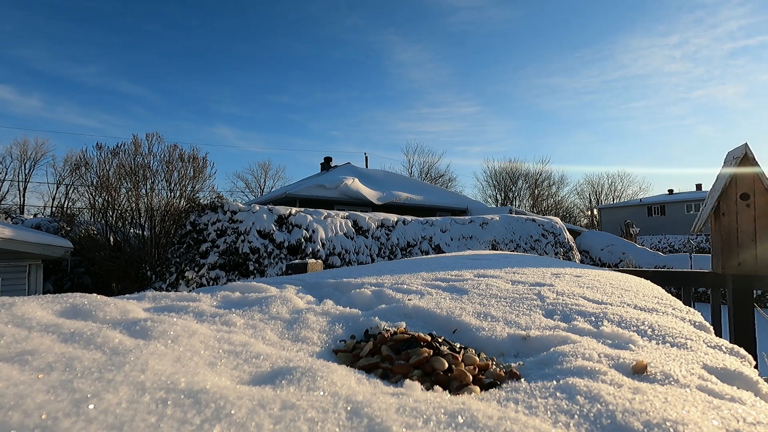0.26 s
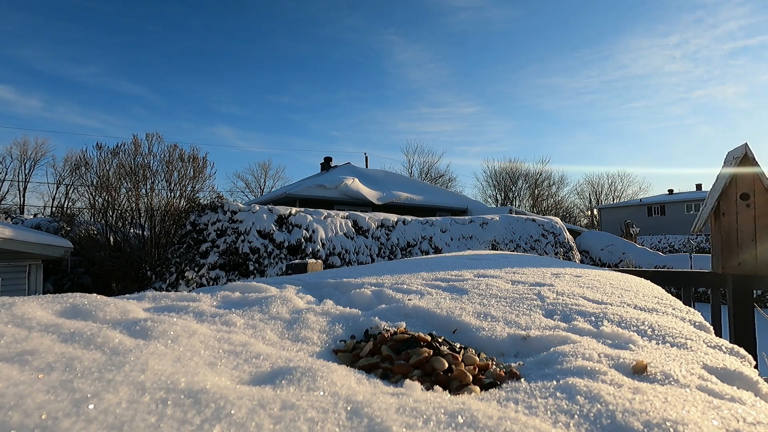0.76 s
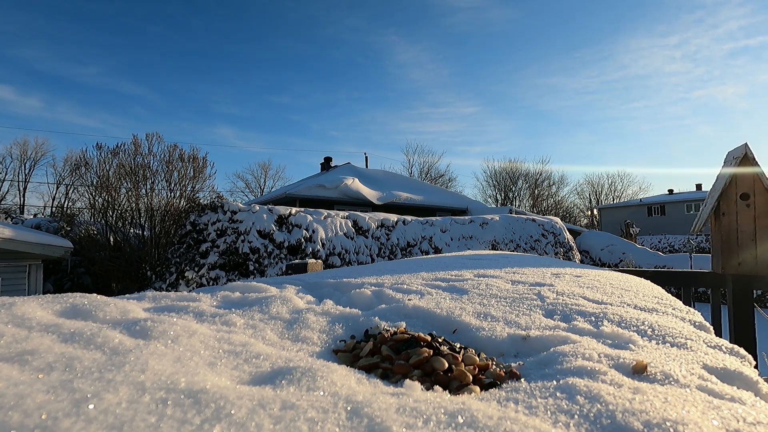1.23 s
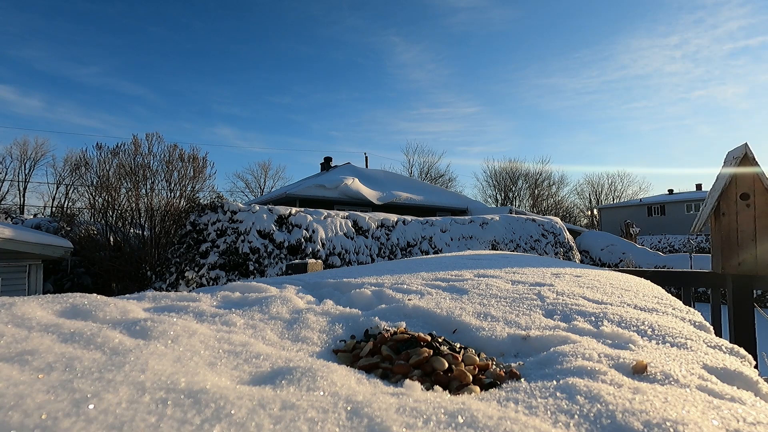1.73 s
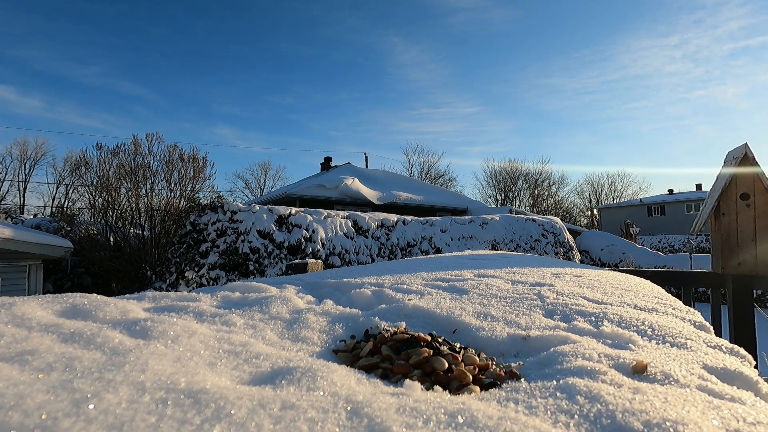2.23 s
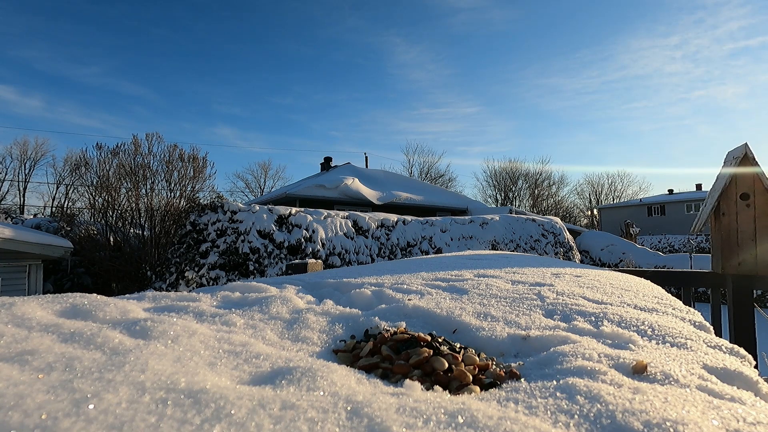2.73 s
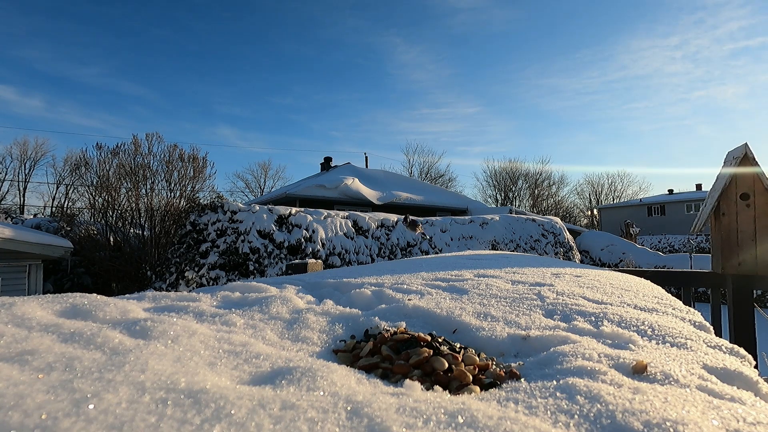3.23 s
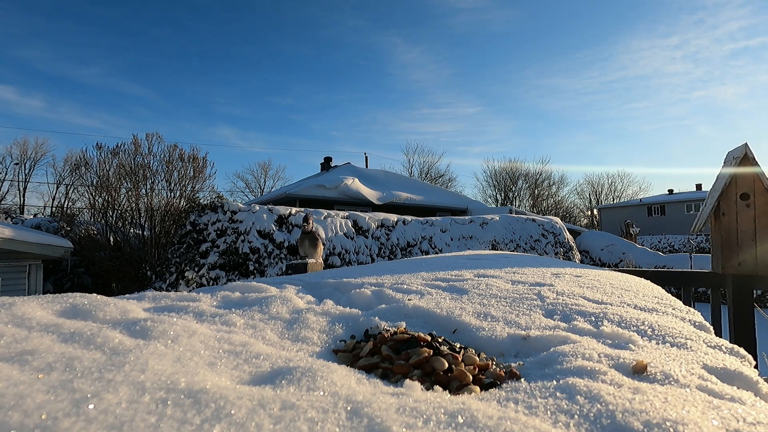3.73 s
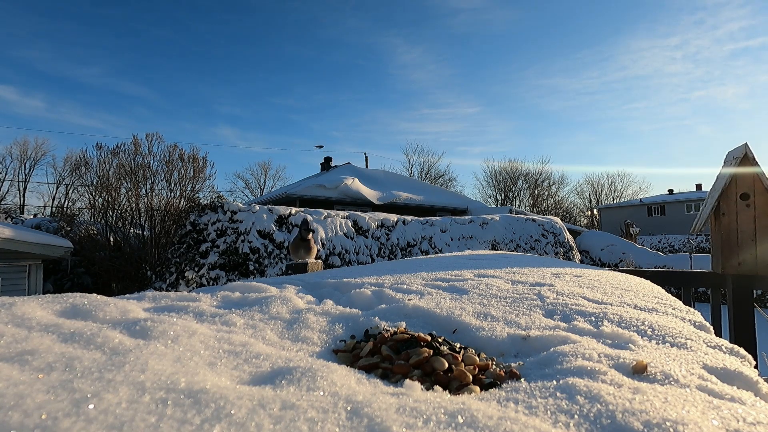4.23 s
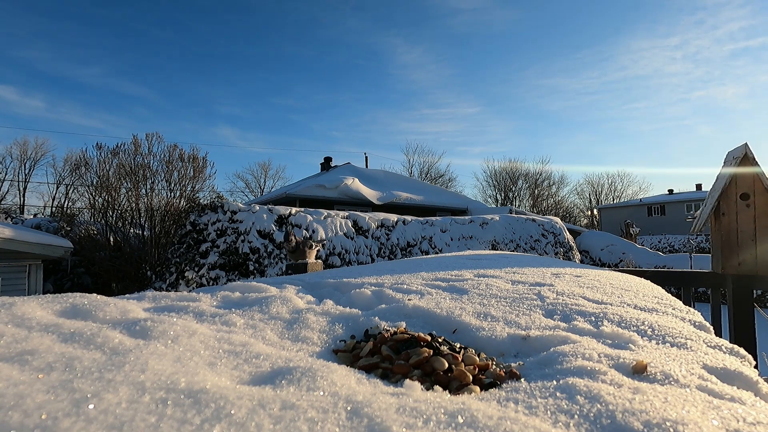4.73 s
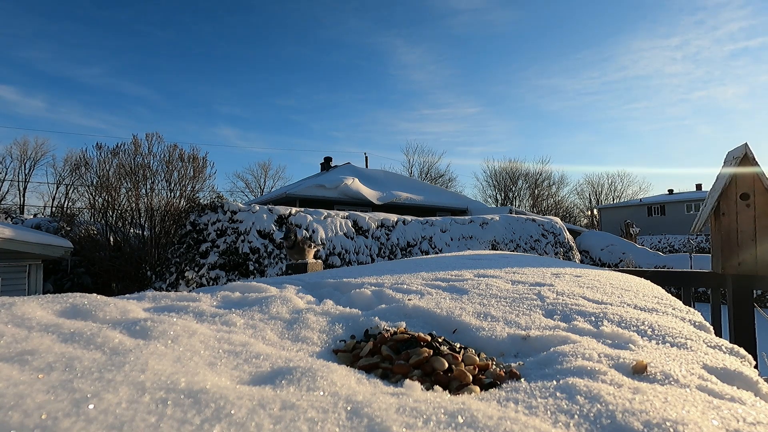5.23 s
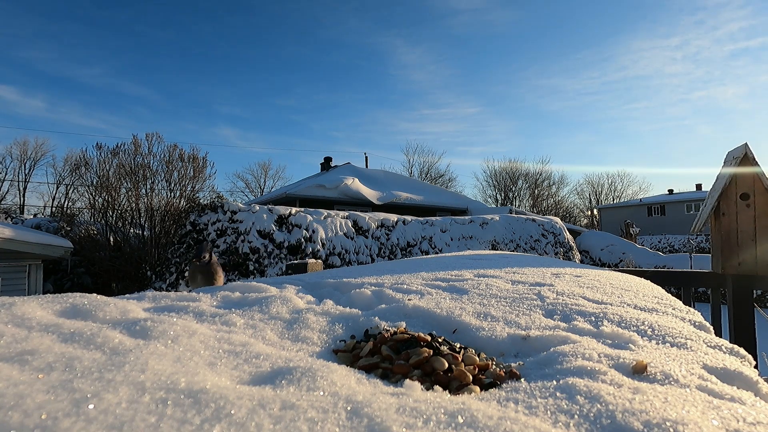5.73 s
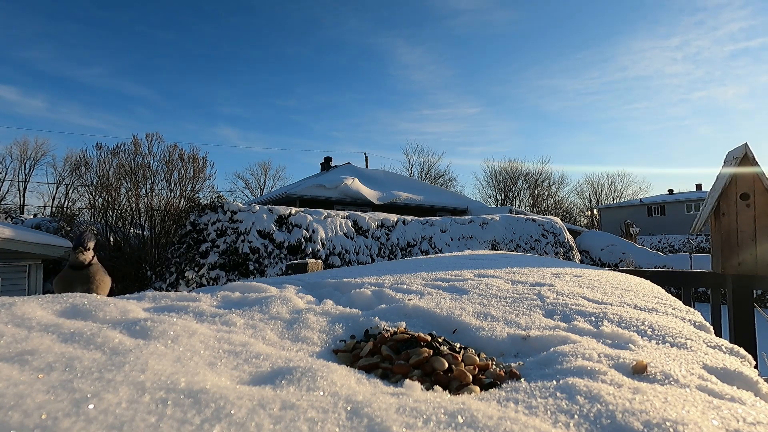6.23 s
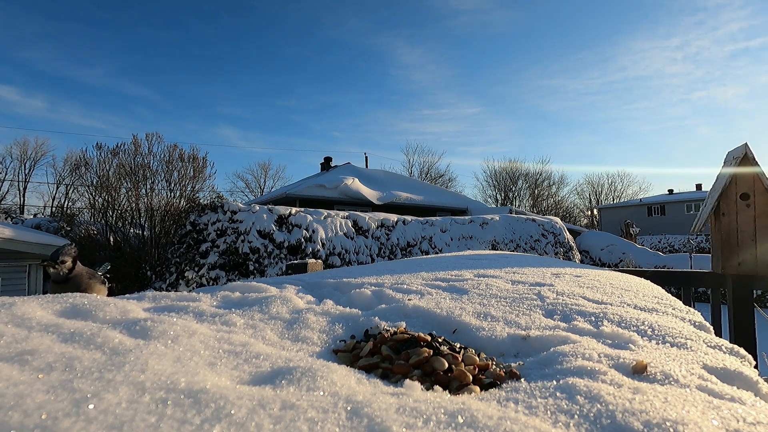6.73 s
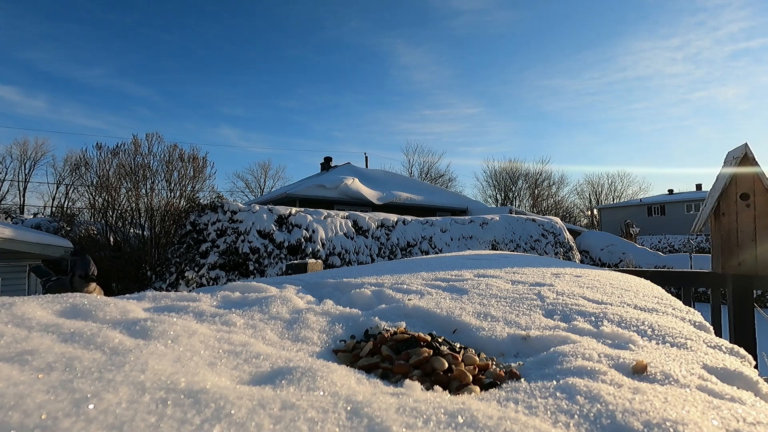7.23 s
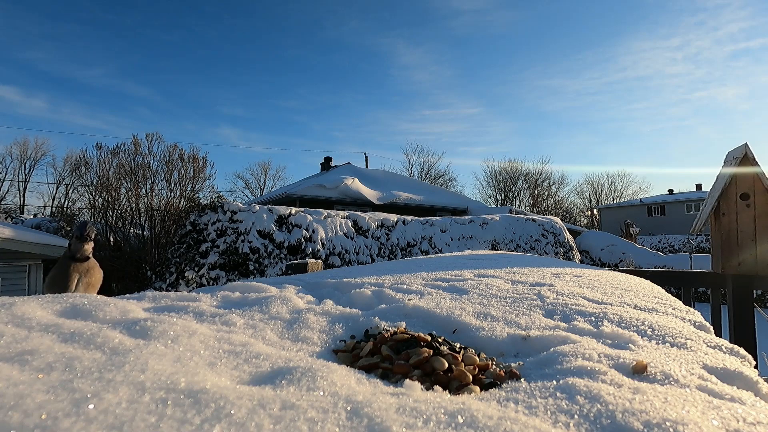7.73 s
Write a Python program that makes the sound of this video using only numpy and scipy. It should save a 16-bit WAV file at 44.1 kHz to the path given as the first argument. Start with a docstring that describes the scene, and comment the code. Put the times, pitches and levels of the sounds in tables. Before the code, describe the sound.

Quiet snowy yard with far town rumble, soft bumps and a claw tick, faint small bird notes, and two raspy jay calls.

```python
"""A snowy backyard over the low rumble of a town, picked up by a two-port microphone.
A blue jay jeers twice, first from cover, then in the open: the two sides of its syrinx start locked
at 2:3, slip apart and beat, which makes the call harsh. Chips, whistles and far notes are gliding tones.
Low puffs of air, a landing, bumps and scratches are short bursts of coloured noise; traffic, buffeting
air, hiss and a recurring sizzle are noise too. Branches and walls scatter and echo the bird voices."""
import sys
import numpy as np
from scipy import signal
from scipy.fft import rfft, irfft, next_fast_len
from scipy.io import wavfile
from scipy.ndimage import uniform_filter1d

SR = 44100
rng = np.random.default_rng(int(sys.argv[2]) if len(sys.argv) > 2 else 0)


def generate_wav(sig):
    """Save sig (samples, or channels by samples) to the path in sys.argv[1] as 16-bit PCM at SR."""
    pcm = np.round(np.clip(np.atleast_2d(sig).T, -1, 1) * 32767).astype(np.int16)
    wavfile.write(sys.argv[1], SR, pcm)


N = 352076
TIME = np.arange(N) / SR

# the town's changing strength, before each layer's own gain: start_s, rumble_db, buffeting_db
TOWN_LEVELS = [(0.0, -58, -68), (0.35, -61.5, -74), (0.69, -60, -70), (2.22, -59, -75.5), (3.0, -57.5, -76),
               (3.91, -54.5, -70), (4.4, -54, -73), (4.8, -48, -55.5), (5.0, -51.5, -67.5),
               (5.24, -50.5, -69), (6.0, -47, -54), (6.22, -48, -55), (6.84, -53.5, -63.5),
               (7.31, -48, -51.5), (7.56, -51.5, -63.5), (7.98, -46.5, -55)]
JEER_S, SCOOP_S = .265, .012  # length of a jeer; time it takes to scoop into pitch and level
LAST_SLIP_HZ = 265  # slip between the jay's voices at the end of a jeer


def from_db(db):
    """Decibels to gain."""
    return 10 ** (np.asarray(db) / 20)


def rms_one(x):
    """Scale to unit power."""
    return x / np.sqrt(np.mean(x ** 2) + 1e-20)


def columns(rows, t):
    """Each column of a curve table at the times t."""
    s, *values = np.transpose(rows)
    return [np.interp(t, s, v) for v in values]


def at_hz(points, hz):
    """Read a spectrum on a log-frequency axis."""
    f, value = np.transpose(points)
    return np.interp(np.log(np.maximum(hz, 1)), np.log(f), value)


def band(x, hz, kind="low", order=2):
    """Butterworth filter."""
    return signal.sosfilt(signal.butter(order, np.clip(hz, 10, .45 * SR), kind, fs=SR, output="sos"), x)


def drift(rate_hz, size):
    """Smooth chance of spread 1: white noise kept below rate_hz."""
    slow = band(rng.standard_normal(size + SR // 2), rate_hz)
    return rms_one(slow)[-size:]


def noise(colour):
    """Stereo noise of rms 1 and given colour (hz, relative db per Hz), falling away above its last point."""
    # how alike left and right are: pitch_hz, likeness (share)
    likeness = [(30, .93), (80, 0.94), (400, 0.9), (1200, 0.48), (4000, 0.27), (8000, 0.73), (12000, 0.26)]
    hz = np.arange(N // 2 + 1) * SR / N
    rolloff = np.hypot(1, (hz / colour[-1][0]) ** 2 / 2)
    mid, side = rfft(rng.standard_normal((2, N))) * from_db(at_hz(colour, hz)) / rolloff
    alike = np.clip(at_hz(likeness, hz), 0, 1)
    return rms_one(irfft(np.sqrt(1 + alike) * mid + np.sqrt(1 - alike) * side * [[1], [-1]], N))


def bursts(rows, rise):
    """Envelope of events (start_s, level_db, fade_s) that swell within about rise seconds and die away."""
    out = np.zeros(N)
    for s, level_db, fade in rows:
        first = int(s * SR)
        age = TIME[:N - first][:2 * SR]
        out[first:][:len(age)] += from_db(level_db) * (1 - np.exp(-age / rise)) * np.exp(-age / fade)
    return out


def span(start, length, edge):
    """The samples that a note covers, their age, and a gate with soft edges."""
    at = np.arange(int(start * SR), int((start + length) * SR))
    gate = np.clip(np.minimum(at - at[0], at[-1] - at) / (edge * SR), 0, 1)
    return at, TIME[:len(at)], gate


def turn(hz):
    """Phase of a running pitch."""
    return 2 * np.pi * np.cumsum(hz) / SR


def ramp(x):
    """Rise from 0 to 1 and stay there."""
    return np.clip(x, 0, 1)


def syrinx(call, pitch, age):
    """A jeer scoops up under high press, relaxes, lets its voices part and drops away."""
    scoop_hz, scoop_db = 416.3, 8.5
    drop_hz, drop_db, drop_s = 186, 16.5, 0.0195
    parting_s, slip_power = 0.0069, 1.6  # the voices part suddenly, then slip ever faster
    upper_db, upper_pressed_db = -3, -6  # strength of the upper voice, and its change under full press
    start, level_db, accent_db, pressed_s, part_s, first_slip_hz, swell_db = call
    scoop = np.exp(-(age / SCOOP_S) ** 2)
    drop = ramp(1 - (JEER_S - age) / drop_s)
    press = 1 / (1 + (age / pressed_s) ** 6)
    parted = ramp((age - part_s) / (JEER_S - part_s))
    low_hz = columns(pitch, start + age)[0] - scoop_hz * scoop - drop_hz * drop
    slip_hz = first_slip_hz + (LAST_SLIP_HZ - first_slip_hz) * parted ** slip_power
    slip_hz *= ramp((age - part_s) / parting_s)
    loud_db = level_db + accent_db * press - scoop_db * scoop - drop_db * drop ** 2
    upper_voice_db = upper_db + upper_pressed_db * press + swell_db * parted ** 2
    return low_hz, slip_hz, loud_db, press, upper_voice_db


def flow_unrest(slip, slip_hz, age):
    """Unruliness of the air flow: always some, more in the scoop, at each jerk and when the slip is fast."""
    calm, at_jerk, at_fastest, in_scoop = .18, .65, 1.25, 2.6
    jerk = np.sin(slip / 2) ** 4
    fast = (slip_hz / LAST_SLIP_HZ) ** 2
    return calm + at_jerk * jerk + at_fastest * fast + in_scoop * np.exp(-age / SCOOP_S)


def jeer(call, pitch, colour, rasp_db, air_db):
    """Two voices share one air stream, so sums and differences of their pitches sound too."""
    # tones the two voices make together: multiple_of_lower, multiple_of_upper
    mixes = [(-1, 1), (1, 0), (-2, 2), (-5, 4), (3, -1), (0, 1), (-3, 3), (2, 0), (-1, 2), (4, -1), (1, 1),
             (-2, 3), (3, 0), (0, 2), (2, 1), (-1, 3), (4, 0), (1, 2), (3, 1), (6, -1), (5, 0), (4, 1),
             (6, 0), (5, 1), (7, 0), (8, 0)]
    # their relative strengths, in the same order: level_db
    mix_db = [-12, -7, -29.5, -16, -14, 4, -26.5, -7.5, -13.5, -31, -17, -20, -9, -23, -11.5, -20, -17,
              -12.5, -15, -24, -25, -26.5, -41, -46, -53, -55.5]
    # what full press, at the start of a jeer, does to the voice: pitch_hz, gain_db
    press_colour = [(900, -10.5), (1750, -14), (2750, -0.5), (3650, 11.5), (4300, 11), (5500, 7), (6400, 4),
                    (7300, 0), (8300, 0), (11000, 8.5)]
    # air noise in the jay's throat: pitch_hz, relative level_db per Hz
    turbulence = [(1300, -29.5), (2000, -1.5), (2800, -6), (4200, 0), (5500, 2), (7000, 3), (7900, 1.5),
                  (9000, -16), (10500, -20), (12500, -32.5), (15500, -34)]
    pitch_wobble = 0.0083  # share of the pitch, at unruliness 1
    beat_pull = 0.15  # radians by which each beat tugs both voices
    at, age, gate = span(call[0], JEER_S, edge=0.0015)
    low_hz, slip_hz, level_db, press, upper_db = syrinx(call, pitch, age)
    high_hz = (3 * low_hz + slip_hz) / 2
    # the voices cling to their lock and pass each other in a jerk
    slip = turn(slip_hz)
    slip -= 0.48 * np.sin(slip)
    unrest = flow_unrest(slip, slip_hz, age)
    wobble = pitch_wobble * unrest * drift(700, len(at))
    common = turn(low_hz * (1 + wobble)) + beat_pull * np.sin(slip)
    low = common + .1 * np.sin(slip)
    high = (3 * common + slip) / 2
    voice = np.zeros(len(at))
    for (m, n), tone_db in zip(mixes, mix_db):
        hz = m * low_hz + n * high_hz
        colour_db = press * at_hz(press_colour, hz) + at_hz(colour, hz) + upper_db * (n != 0)
        flutter_db = 1.95 * drift(94, len(at))
        throat_lag = (hz / 2000) ** 2  # the throat smears each pulse
        voice += from_db(tone_db + colour_db + flutter_db) * np.cos(m * low + n * high - throat_lag)
    voice /= np.sqrt(uniform_filter1d(voice ** 2, size=200))  # even out the loudness
    voice *= 1 + from_db(rasp_db) * unrest * drift(600, len(at))
    voice += from_db(air_db) * unrest * noise(turbulence)[0, at]
    voice = band(voice, (1170, 1420), "bandstop")  # Hz; the throat passes little here
    out = np.zeros(N)
    out[at] = band(voice * gate * from_db(level_db), 820, "high", order=4)
    return out


def jay():
    """Two jeers: one through the hedge with much scatter, one in the open with little."""
    # jeers: start_s, level_db, opening_accent_db, pressed_s, voices_part_after_s, first_slip_hz,
    # upper_voice_swell_db
    calls = [(1.894, -38.5, 3, 0.032, .05, 104, 9), (4.8135, -25, 7, 0.03, .082, 60, 1)]
    # lower voice through the body of each jeer, one list per jeer: time_s, pitch_hz
    pitches = [
        [(1.915, 1833), (1.939, 1872), (1.961, 1774), (2.031, 1744), (2.14, 1610)],
        [(4.835, 1840), (4.863, 1850), (4.873, 1805), (4.921, 1808), (4.985, 1707), (5.062, 1697)],
    ]
    # throat and beak as heard through the hedge: pitch_hz, gain_db
    colour_hidden = [(900, -1), (1700, 8.5), (2650, 3.5), (3500, 5), (4400, 2.5), (5300, -3.5),
                     (6200, -4.5), (7200, 5), (8200, -24), (11000, 7)]
    # throat and beak as heard in the open: pitch_hz, gain_db
    colour_open = [(900, -4), (1700, 2.7), (2650, -2), (3500, -2), (4400, 2), (5300, -7), (6300, 2.5),
                   (7200, 6), (8300, -8), (11000, 2.5)]
    hidden = jeer(calls[0], pitches[0], colour_hidden, rasp_db=-22, air_db=-18)
    near = jeer(calls[1], pitches[1], colour_open, rasp_db=-20, air_db=-13)
    hidden = yard(hidden, scatter_db=-5.5, echo_db=-2, pan_db=-.5)
    return hidden + yard(near, scatter_db=-23.0, echo_db=-1, pan_db=1.1)


def tone(at, hz, height, waver):
    """A nearly pure note on the given samples; waver is a share of its pitch."""
    out = np.zeros(N)
    out[at] = np.sqrt(2) * height * np.sin(turn(hz * (1 + waver * drift(200, len(at)))))
    return out


def arch(share):
    """Level in dB of a note that swells to its middle and is 8 dB softer at its ends."""
    return -8 * (2 * share - 1) ** 2


def chip(start, length, level_db):
    """A quick high downward slide."""
    from_hz, to_hz, glide = 8000, 6400, .23  # glide as a share of the length
    at, age, gate = span(start, length, edge=0.00156)
    hz = to_hz + (from_hz - to_hz) * np.exp(-age / (glide * length))
    return tone(at, hz, gate * from_db(level_db + arch(age / length)), waver=0.012)


def whistle(start, length, held_s, first_hz, held_hz, level_db):
    """Glide to a pitch, climb a little while holding it, then fall to a softer tail."""
    glide_s, climb_hz_per_s = .017, 720
    onset_db, swell_s = 22, 0.021
    fall_hz, fall_s, fall_db = 735, .023, 12
    at, age, gate = span(start, length, edge=0.003)
    fall = 1 - np.exp(-np.maximum(age - held_s, 0) / fall_s)
    hz = held_hz + (first_hz - held_hz) * np.exp(-age / glide_s) - fall_hz * fall
    hz += climb_hz_per_s * (np.minimum(age, held_s) - held_s / 2)
    loud_db = level_db - onset_db * np.exp(-age / swell_s) - fall_db * ramp(2 * fall)
    return tone(at, hz, gate * from_db(loud_db), waver=0.0099)


def chips_and_whistles():
    """High chips of a small bird and soft whistles of the jay, scattered by the branches."""
    # high chips of a small bird: start_s, length_s, level_db
    chips = [(1.734, .062, -68), (3.273, 0.0334, -51.5)]
    # soft whistles of the jay: start_s, length_s, held_s, first_hz, held_hz, level_db
    whistles = [(5.559, 0.14, 0.11, 2970, 2670, -61.5), (5.784, 0.2, .115, 2360, 2616, -56),
                (6.039, .205, .118, 2190, 2570, -56.5)]
    small = sum(chip(*row) for row in chips) + sum(whistle(*row) for row in whistles)
    return yard(small, scatter_db=-5.0, echo_db=-8.0, pan_db=-3.0)


def far_note(start, length, first_hz, last_hz, level_db):
    """A note that wanders as it sinks."""
    at, age, gate = span(start, length, edge=.01)
    wander = .011 * drift(14, len(at))  # slow unsteadiness, share of the pitch
    hz = (first_hz + (last_hz - first_hz) * age / length) * (1 + wander)
    return tone(at, hz, gate * from_db(level_db + arch(age / length)), waver=.021)


def far_birds():
    """Sinking notes at a distance: their level flutters and scatter outweighs the direct sound."""
    # start_s, length_s, first_hz, last_hz, level_db (before the distance loss)
    far_notes = [(.42, 0.6, 3450, 3110, -79.5), (1.499, 0.6, 3560, 3270, -86), (2.45, 0.6, 3230, 3053, -82),
                 (5.499, 0.63, 3400, 3150, -83), (6.756, 0.15, 1017, 885, -64)]
    distance_db = -11
    far = sum(far_note(*row) for row in far_notes) * from_db(3 * drift(25, N) + distance_db)
    return yard(far, scatter_db=1.5, echo_db=5.0, pan_db=6.0)


def air_puffs():
    """Soft low puffs of air: low-passed noise that starts fast and fades."""
    # start_s, level_db, fade_s, upper_edge_hz
    puffs = [(.195, -48, 0.057, 267), (.916, -44.5, 0.048, 210), (1.693, -45.5, 0.09, 493),
             (3.298, -35.5, 0.02, 229), (3.644, -51, 0.04, 230), (3.787, -44.5, 0.049, 556),
             (5.809, -38, .028, 224), (6.01, -36.5, .027, 238), (6.341, -38, 0.094, 249)]
    air = noise([(20, 3.5), (60, -18.5), (200, 10), (600, -11.5), (2000, -6)])
    out = np.zeros((2, N))
    for s, level_db, fade, edge_hz in puffs:
        puff = rms_one(band(air, edge_hz, order=3))
        out += puff * bursts([(s, level_db, fade)], rise=0.0015)
    return out


def take_off():
    """Air stirred by the wing beats of a take-off."""
    # start_s, level_db, fade_s
    whooshes = [(1.684, -51.5, 0.077), (1.735, -59, 0.02), (1.805, -65.5, 0.066)]
    air = noise([(150, -16), (330, -4.5), (480, 6.0), (650, -6.0), (1100, -5.5), (1450, -16), (1900, -39.5)])
    return bursts(whooshes, rise=0.0047) * air


def fidgets(count):
    """Faint brushes and scratches scattered over the birds' visit: rows of start_s, level_db, fade_s."""
    from_s, to_s = 3.9, 6.8
    mean_db, spread_db = -74, 2.5
    short_s, long_s = .008, .05
    when, size, kind = rng.random((count, 3)).T
    s = from_s + (to_s - from_s) * (np.arange(count) + when) / count
    level_db = mean_db + spread_db * (2 * size - 1)
    fade_s = short_s * (long_s / short_s) ** kind
    return list(zip(s, level_db, fade_s))


def scratches():
    """Feathers brush and claws scratch in the snow: short strokes start abruptly, long ones swell."""
    # start_s, level_db, fade_s
    rustles = [(3.225, -60.5, 0.073), (3.313, -66, 0.013), (3.588, -64, 0.045), (3.664, -67, 0.053),
               (3.787, -61.5, 0.035), (3.827, -65, .014), (4.112, -66, 0.0073), (5.555, -64.5, 0.065),
               (5.845, -61.5, 0.022), (6.026, -59.5, 0.037), (6.185, -61, 0.036), (6.70, -66.5, .013),
               (6.738, -65, 0.019), (7.29, -63.5, .028), (7.3245, -61.5, .0062)]
    # pitch_hz, relative level_db per Hz
    rustle_colour = [(600, 4.5), (1500, 0), (3000, -3), (5000, 2.5), (7000, 3), (9000, -6), (12500, -6),
                     (15000, -26)]
    strokes = np.zeros(N)
    for s, level_db, fade in list(rustles) + fidgets(count=9):
        strokes += bursts([(s, level_db, fade)], rise=7 * fade ** 2)
    return strokes * noise(rustle_colour) * from_db(3.0 * drift(400, N))


def claw_strike():
    """Claws strike the post: a very short burst with several resonances."""
    # start_s, level_db, fade_s
    landing = [(3.785, -37.5, 0.0021)]
    # pitch_hz, relative level_db per Hz
    landing_colour = [(880, -50), (1500, -19), (2650, -31), (3120, -5), (3400, -30), (3750, 3), (4410, 0),
                      (6300, -4), (8410, -2.5), (11500, -23), (15000, -36)]
    return bursts(landing, rise=0.00024) * noise(landing_colour)


def foot_knocks():
    """Feet come down on snowy wood: short bursts strongest in the lows."""
    # start_s, level_db, fade_s
    knocks = [(3.313, -64.5, 0.036), (3.787, -64, 0.015), (6.03, -55.5, 0.051), (6.738, -54.5, 0.024),
              (7.326, -50, 0.012)]
    return bursts(knocks, rise=0.00088) * noise([(200, 9.5), (600, -19), (1400, -0.5), (2500, -15), (4000, -18)])


def railing_bumps():
    """Deep soft bumps as a bird brushes the railing."""
    # start_s, level_db, fade_s
    bumps = [(3.296, -43, 0.043), (3.643, -45.5, 0.033), (3.9, -49, 0.077), (4.62, -55.5, .08),
             (6.25, -47, .1)]
    return bursts(bumps, rise=0.0024) * noise([(20, -8), (40, -1.0), (75, 0), (120, -5.5), (250, -32)])


def sizzle():
    """A thin high sizzle comes back about every two seconds."""
    # start_s, level_db, fade_s
    sizzles = [(1.15, -74.5, 0.25), (3.16, -71.5, 0.2), (5.14, -76, 0.36), (7.11, -74, 0.28)]
    # pitch_hz, relative level_db per Hz
    sizzle_colour = [(5000, -32), (6300, -5), (7300, 2.5), (7800, -3.5), (8500, -36.5)]
    return bursts(sizzles, rise=0.01) * noise(sizzle_colour) * from_db(2.2 * drift(50, N))


def patchy(x, edges, depth_db, rate_hz):
    """Neighbouring bands of a distant noise swell and fade on their own."""
    out = x
    for pair in zip(edges, edges[1:]):
        swell = from_db(depth_db * drift(rate_hz, N))
        out = out + band(x, pair, "band") * (swell - 1)
    return out


def traffic_rumble():
    """Far traffic: low noise whose bands swell apart and whose level follows the town."""
    # pitch_hz, relative level_db per Hz
    rumble_colour = [(50, -28.5), (108, -18.5), (145, 0.5), (200, 1), (245, -1.5), (295, -8.5), (420, -9.5),
                     (520, -21), (700, -40.5), (1200, -57.5)]
    rumble_db, _ = columns(TOWN_LEVELS, TIME)
    rumble = patchy(noise(rumble_colour), [130, 175, 220, 280, 380, 500], depth_db=2.5, rate_hz=4)
    rumble *= from_db(rumble_db + 0.64 + 0.67 * drift(13, N))
    return rumble * from_db([[.25], [-.25]])  # slightly stronger on the left


def tyre_wash():
    """Far tyre wash: mid-range noise that follows the rumble 19 dB below its table level."""
    # pitch_hz, relative level_db per Hz
    wash_colour = [(300, 0.5), (600, 2.5), (800, -5), (1100, 2), (1400, -3), (1700, -8.5), (2300, -16),
                   (4000, -28.5), (8000, -43.5)]
    rumble_db, _ = columns(TOWN_LEVELS, TIME)
    wash = patchy(noise(wash_colour), [780, 900, 1050, 1220, 1420], depth_db=2, rate_hz=5)
    return wash * from_db(rumble_db - 19)


def buffeting():
    """Buffeting air: deep noise with strong quick swings in level."""
    # pitch_hz, relative level_db per Hz
    buffet_colour = [(15, -7.5), (30, -6), (60, 4), (100, 2.5), (160, -7.5), (300, -30)]
    _, buffet_db = columns(TOWN_LEVELS, TIME)
    swing_db = 6.4 * np.clip(drift(16, N), -2, 1.5)
    buffet = from_db(buffet_db + 2.5 + swing_db) * noise(buffet_colour)
    return buffet * from_db([[.25], [-.25]])  # slightly stronger on the left


def hiss():
    """Steady hiss."""
    # pitch_hz, relative level_db per Hz
    hiss_colour = [(1000, 4.5), (2500, -1), (4000, -2.5), (5500, 0.5), (7400, 1), (8500, -9.5),
                   (11000, -14), (12100, -6), (13000, -15.5), (16000, -22.5)]
    return from_db(-78.5) * noise(hiss_colour)


def yard(x, scatter_db, echo_db, pan_db):
    """Direct sound, quick scatter from branches, a few dull echoes and a faint far tail."""
    # fence, hedge and houses, before echo_db is added: delay_s, level_db
    echoes = [(0.021, -18), (.043, -39.5), (.2, -44)]
    scatter_t60, far_t60, far_db = 0.28, 0.63, -21  # s to fall by 60 dB; far tail against the scatter
    age = TIME[:SR]
    fade = from_db(-60 * age / scatter_t60) + from_db(far_db - 60 * age / far_t60)
    response = from_db(scatter_db) * rng.standard_normal((2, SR)) * fade / np.sqrt(np.sum(fade ** 2))
    walls = np.zeros(SR)
    for delay, level_db in echoes:
        walls[int(delay * SR)] += from_db(level_db + echo_db)
    response += band(walls, 4200)
    response[:, 0] += from_db([pan_db / 2, -pan_db / 2])  # direct sound; positive pan is left
    return signal.fftconvolve(x[None], response, axes=1)[:, :N]


def ports(x, size=4096):
    """Sound reaches the two microphone ports out of step, by a phase that depends on pitch."""
    # pitch_hz, left_lead_rad (negative: left lags)
    port_phase = [(150, -.02), (1000, -.22), (1750, -.4), (2700, -.62), (4000, -.55), (8000, -.65),
                  (12000, -.5)]
    padded = np.pad(x, ((0, 0), (size, size)), mode="reflect")
    n = next_fast_len(padded.shape[1])
    lead = at_hz(port_phase, np.arange(n // 2 + 1) * SR / n)
    return irfft(rfft(padded, n) * np.exp(.5j * lead * [[1], [-1]]), n)[:, size:size + N]


def scene():
    """Everything in the yard, at the microphone ports."""
    voices = jay() + chips_and_whistles() + far_birds()
    stirred_air = air_puffs() + take_off()
    contacts = scratches() + claw_strike() + foot_knocks() + railing_bumps()
    background = sizzle() + traffic_rumble() + tyre_wash() + buffeting() + hiss()
    return ports(voices + stirred_air + contacts + background)


def record(dry):
    """A steep low-pass cuts the top above 15.8 kHz."""
    return signal.sosfilt(signal.ellip(10, .1, 80, 15800, fs=SR, output="sos"), dry)


dry = scene()
out = record(dry)
generate_wav(out)
```